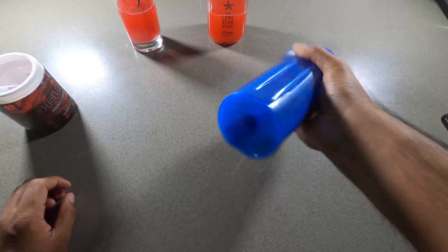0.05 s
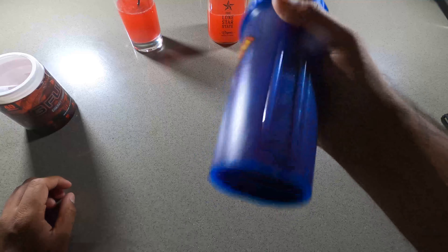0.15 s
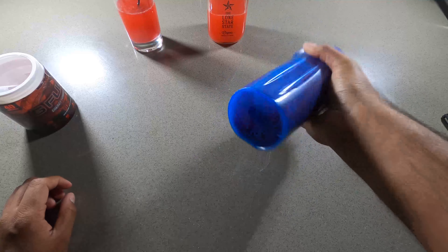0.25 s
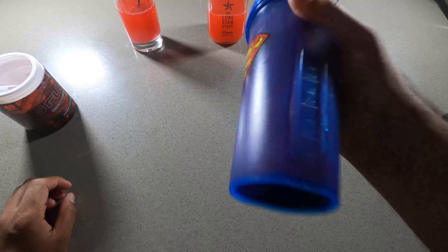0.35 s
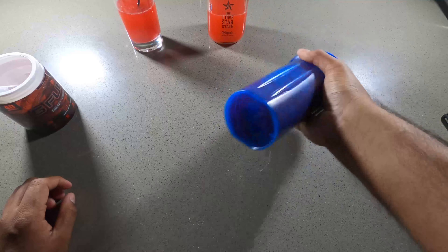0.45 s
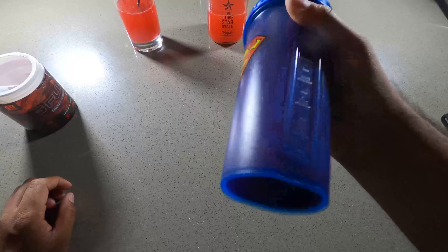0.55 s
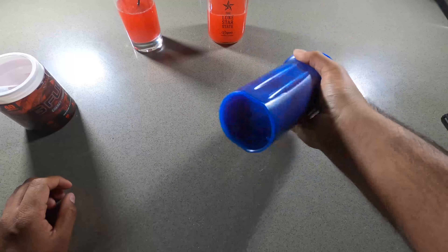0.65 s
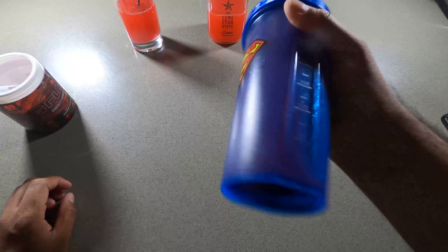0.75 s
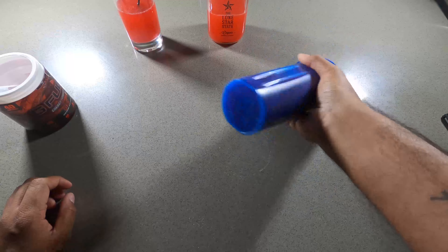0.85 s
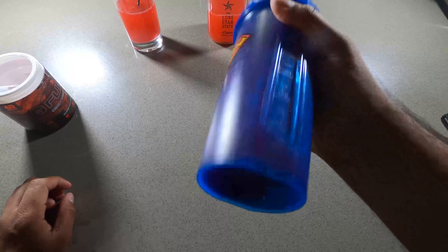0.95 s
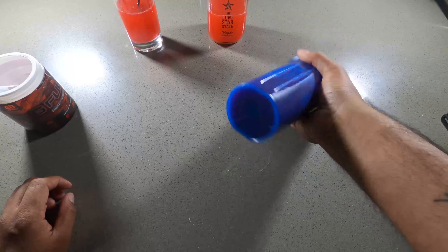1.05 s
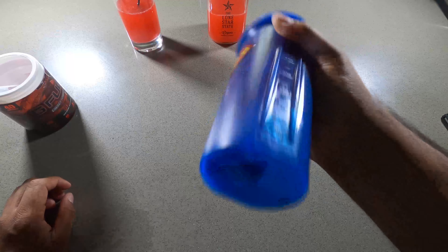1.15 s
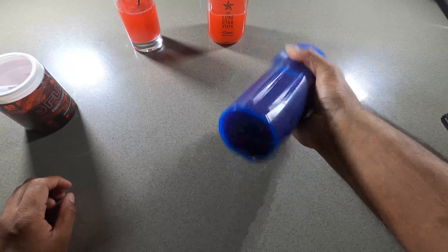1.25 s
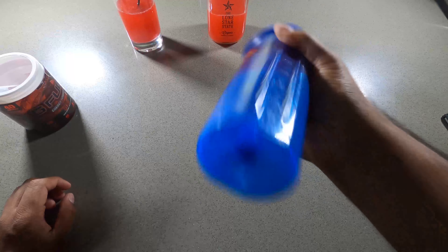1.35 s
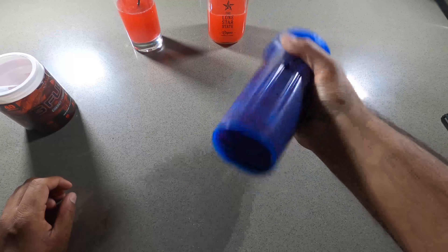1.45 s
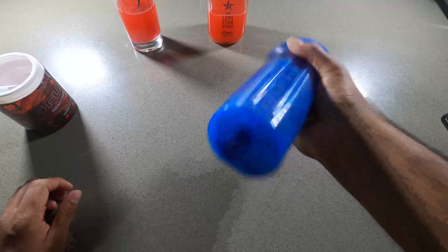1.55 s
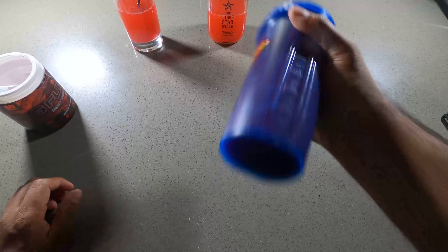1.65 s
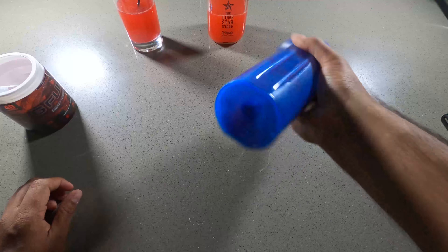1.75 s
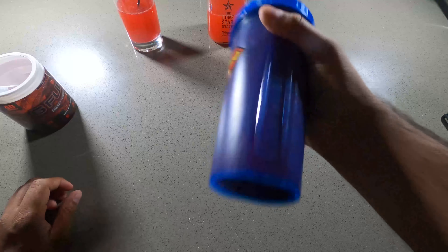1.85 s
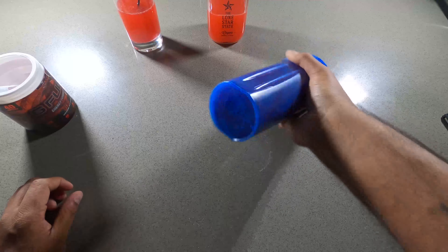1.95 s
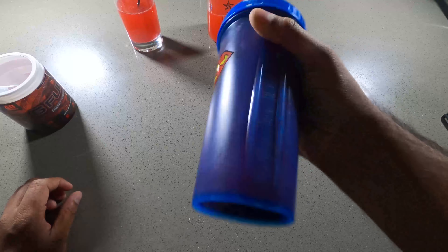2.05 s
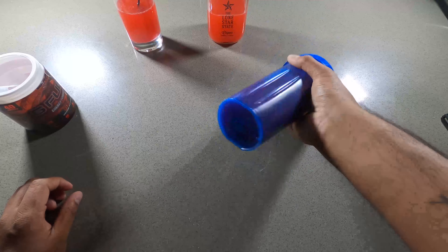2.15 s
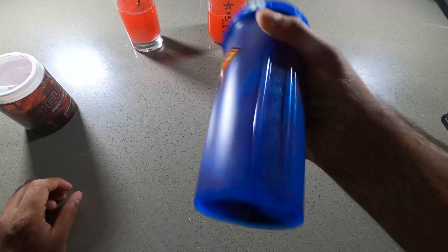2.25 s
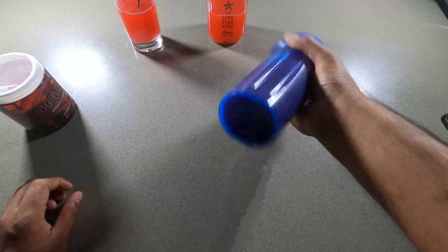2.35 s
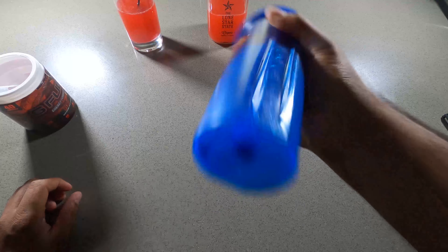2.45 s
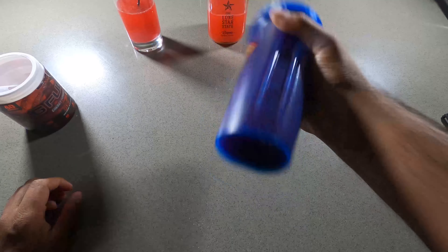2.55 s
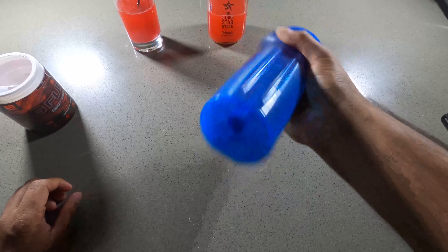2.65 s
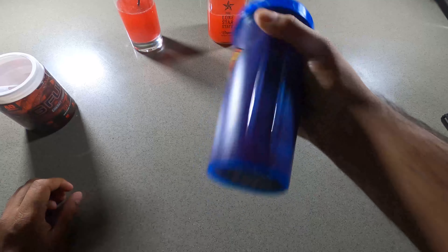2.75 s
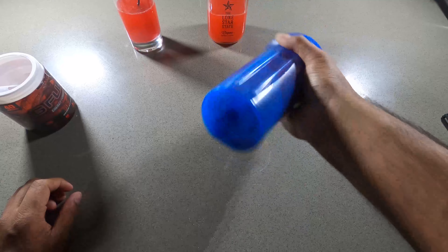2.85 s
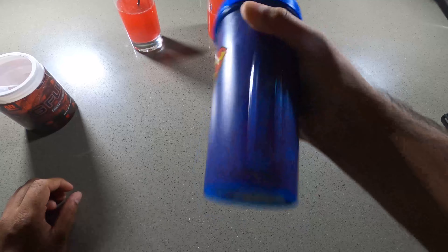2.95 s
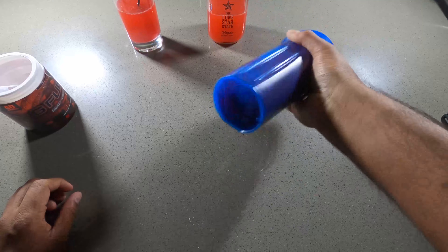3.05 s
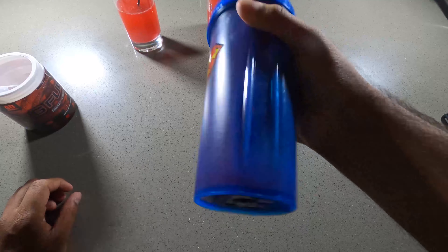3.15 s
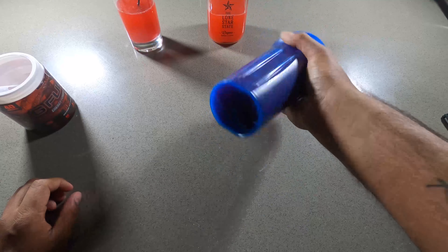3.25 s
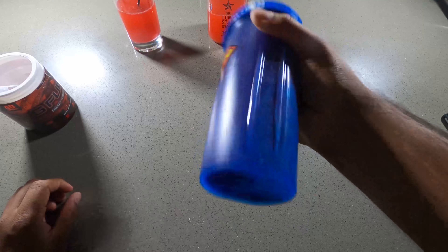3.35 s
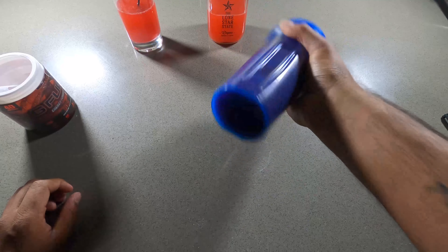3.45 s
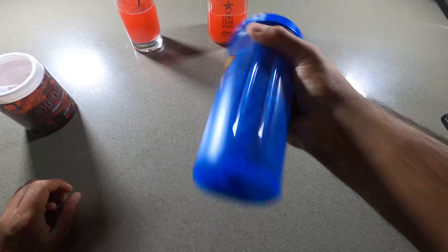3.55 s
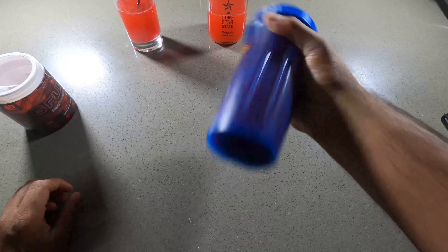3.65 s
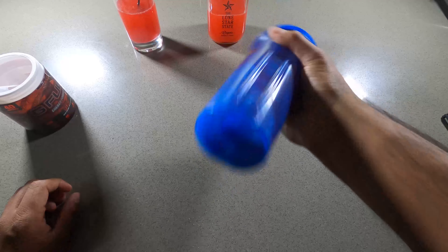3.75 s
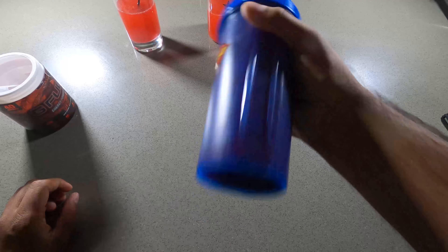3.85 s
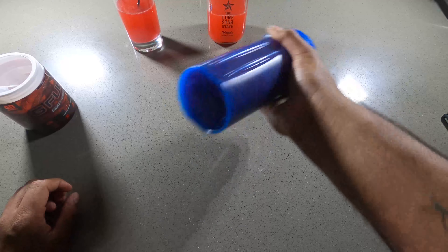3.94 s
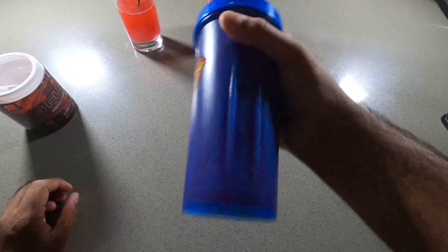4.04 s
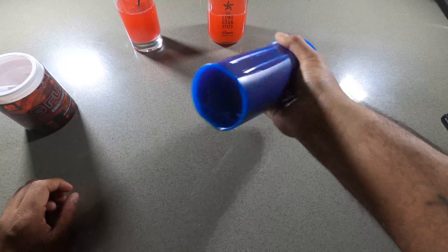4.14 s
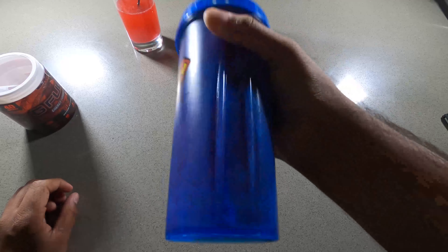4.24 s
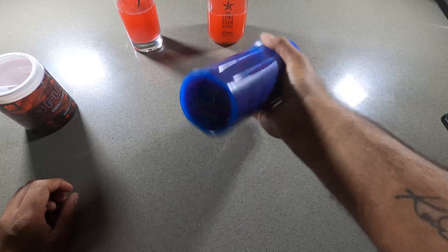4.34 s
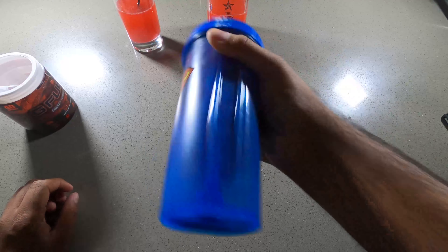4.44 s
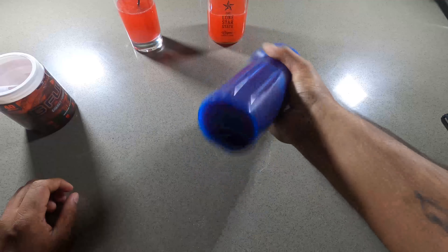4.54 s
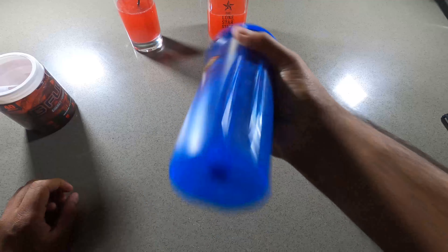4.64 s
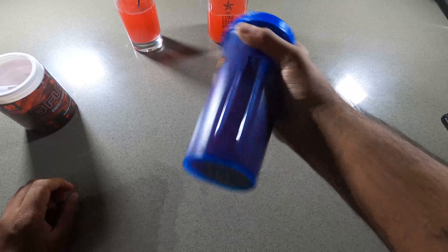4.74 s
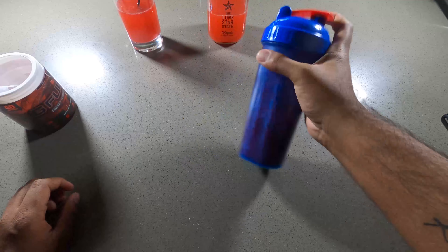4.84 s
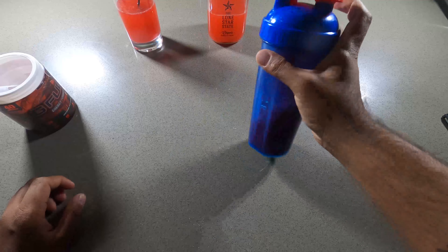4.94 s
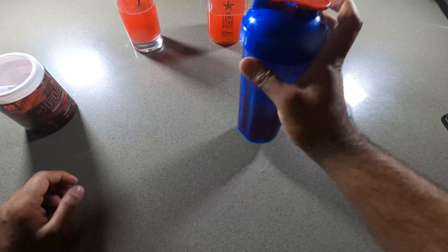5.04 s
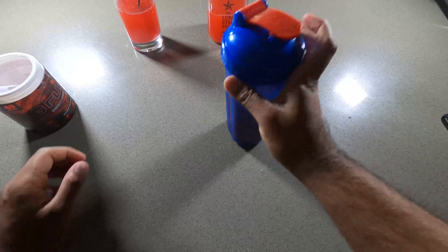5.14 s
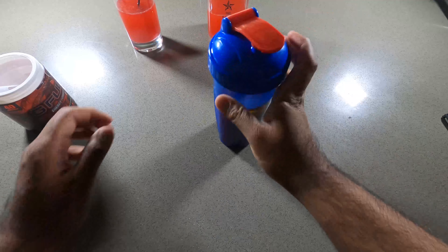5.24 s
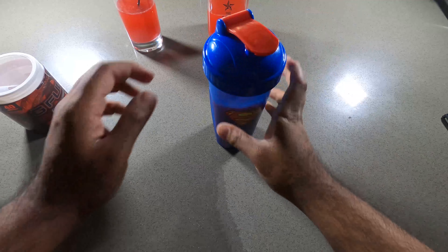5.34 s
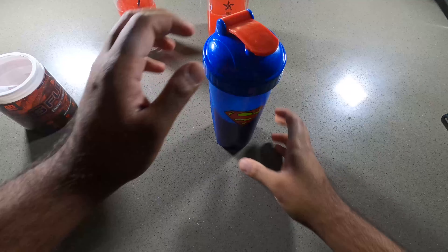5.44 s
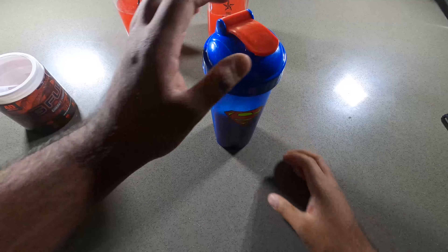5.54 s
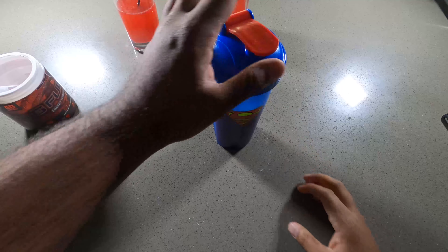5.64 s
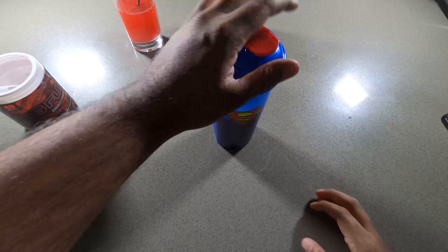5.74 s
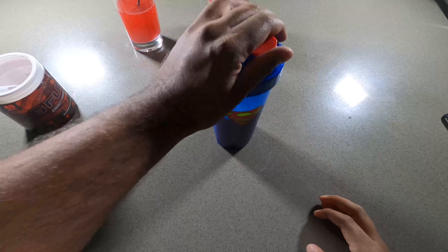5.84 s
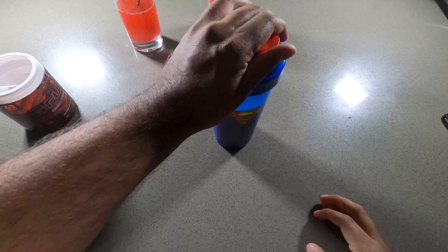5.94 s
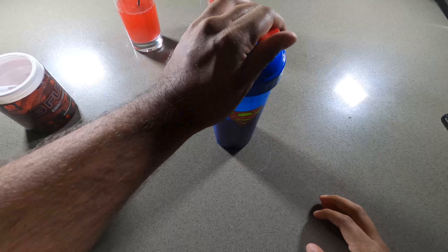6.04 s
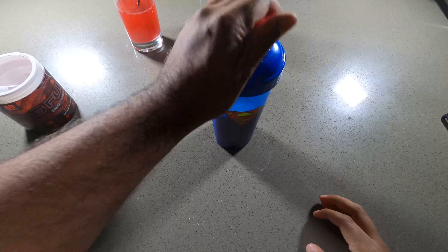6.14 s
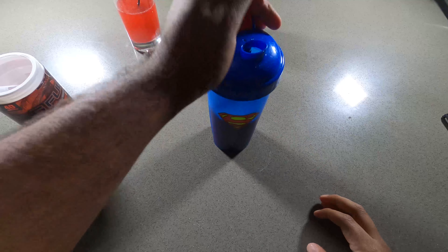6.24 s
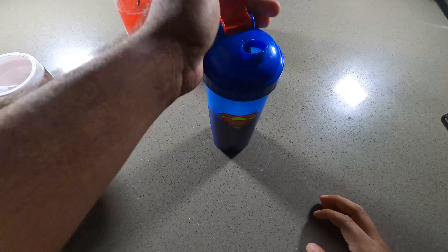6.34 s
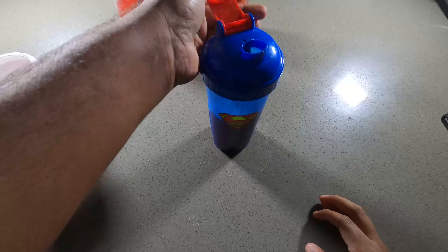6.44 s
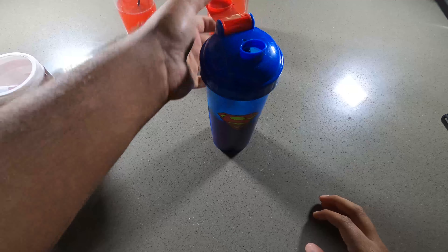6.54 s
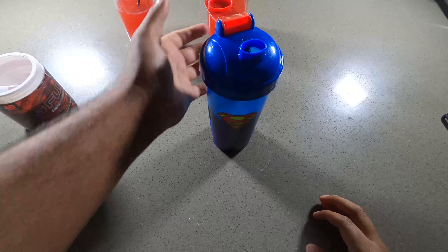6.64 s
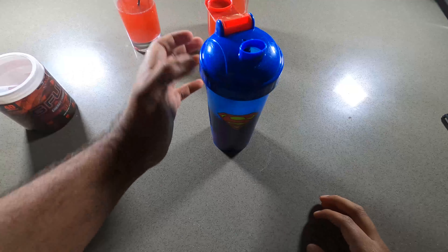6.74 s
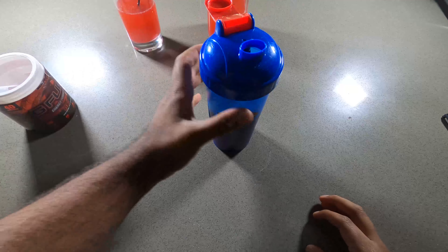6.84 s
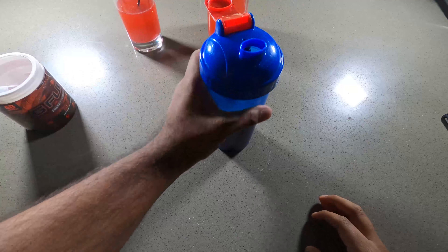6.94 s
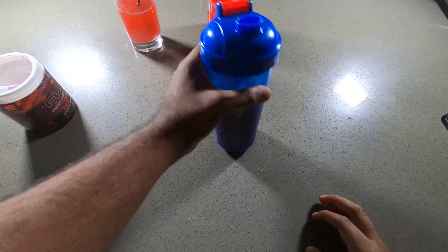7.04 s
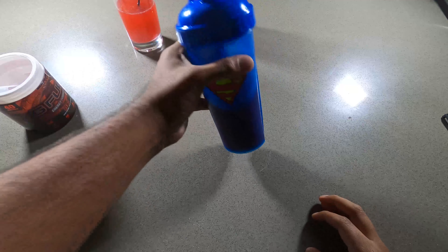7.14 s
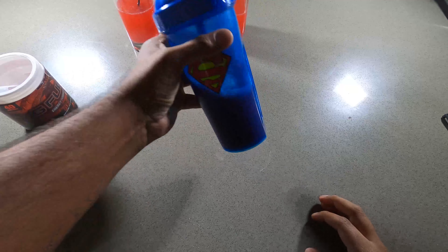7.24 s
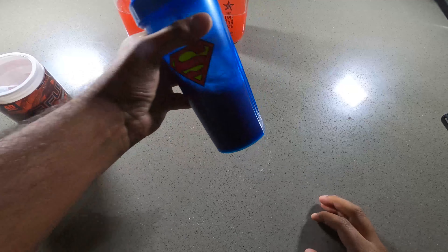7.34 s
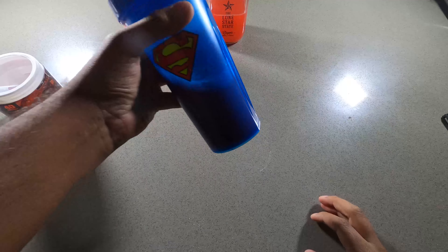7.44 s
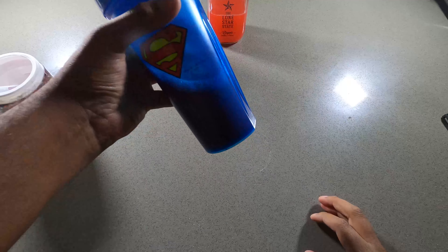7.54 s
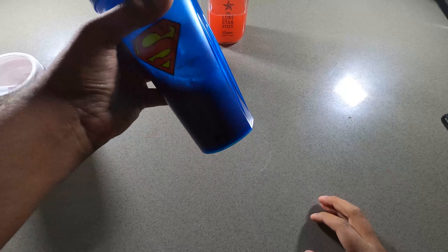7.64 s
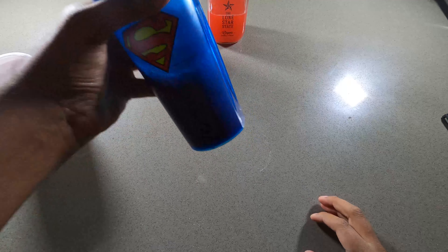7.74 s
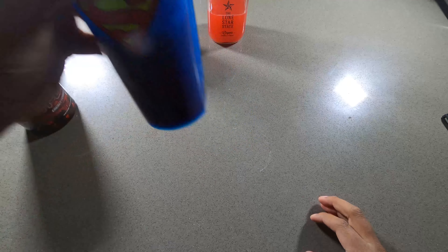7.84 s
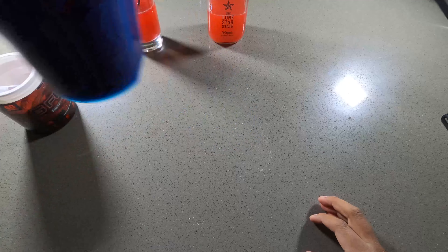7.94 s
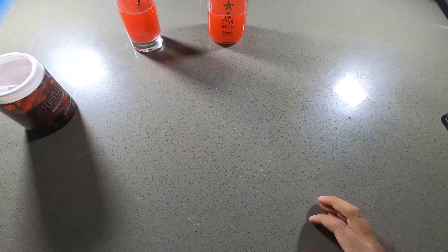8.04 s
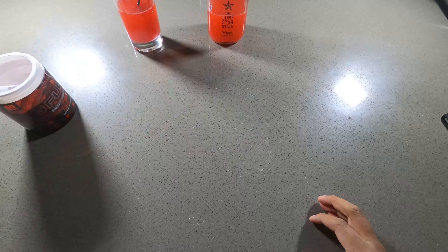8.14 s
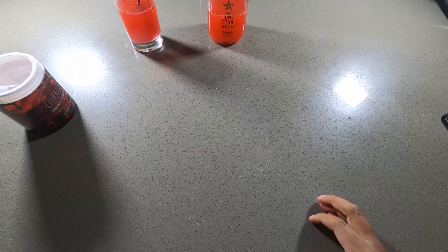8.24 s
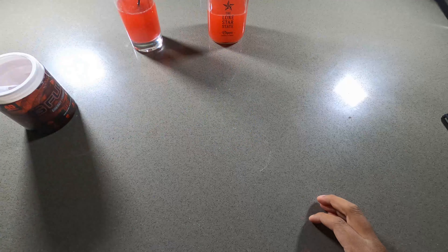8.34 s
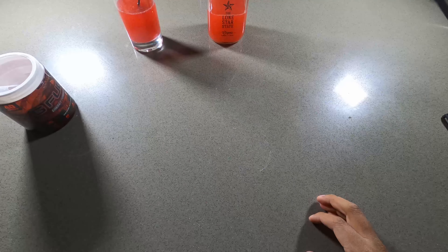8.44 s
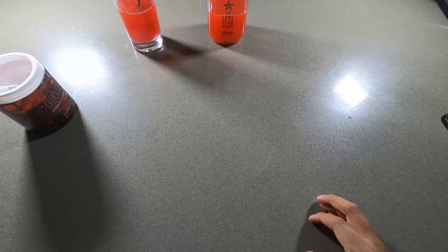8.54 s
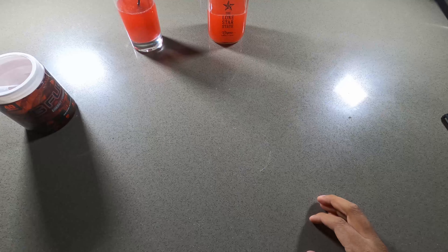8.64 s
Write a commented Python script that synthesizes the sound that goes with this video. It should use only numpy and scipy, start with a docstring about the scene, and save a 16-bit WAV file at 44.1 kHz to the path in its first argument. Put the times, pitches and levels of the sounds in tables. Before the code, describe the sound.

From 0 to 4.9 seconds a half-full plastic shaker cup is shaken hard, about 4.6 strokes a second. Each stroke gives a strong wet splash and a softer return, with bright bubbly spray, low gulps, hollow plops and an irregular wire whisk clacking on the plastic; the force varies, with heavier strokes near 4.4 to 4.8. At 5.0 and 5.3 the cup hits a hard counter with two loud cracks, the first with a boomier thud, and the whisk ticks between them. Foam fizzes and dies away. Around 6.1 the cap pops open with a sharp snap and small thump, releasing faint fizz; at 6.6 a crisp double click as it folds back. From 7.1 come light fingertip taps and skin rubs, very faint distant hollow puffs around 7.4 to 7.8, and tiny handling ticks near 8.3 over a quiet room. Close stereo, with hard-room reflections.

```python
"""Drink surges from end to end of a plastic shaker cup in spray and gulps, and a wire whisk ticks on its wall.
The cup lands with two knocks, the whisk settles, the foam fizzes, the cap pops open; a hard room answers.
Liquid is swarms of rising bubble rings and clicks under surge envelopes; whisk, air pockets and hand are
short rings and noise bursts; knocks are filtered impulses over counter modes; the room is sparse decaying taps."""
import sys
import numpy as np
from scipy import signal
from scipy.fft import rfft, irfft
from scipy.io import wavfile

SR = 44100
rng = np.random.default_rng(int(sys.argv[2]) if len(sys.argv) > 2 else 0)


def master(y):
    """Save y as 16-bit WAV."""
    cut = np.clip(np.atleast_2d(y).T, -1, 1)
    pcm = np.round(cut * 32767)  # scale
    wavfile.write(sys.argv[1], SR, pcm.astype(np.int16))


N = 383229
TIME = np.arange(N) / SR
EDGE_HZ = 15800
STOP_S = 4.9  # the hand stops shaking


def amp(db):
    """dB to amplitude."""
    return 10 ** (np.asarray(db) / 20)


def unit(x):
    """Scales to RMS 1."""
    return x / np.sqrt(np.mean(x ** 2) + 1e-20)


def peaked(x):
    """Scales to peak 1."""
    return x / abs(x).max()


def read(points, hz):
    """Reads a (f/Hz, value) curve, linear over log frequency."""
    f, value = np.transpose(points)
    return np.interp(np.log(hz + 1), np.log(f + 1), value)


def add(mix, s, sound):
    """Mixes a sound in at s seconds; what falls outside is dropped."""
    start = round(s * SR)
    sound = sound[max(-start, 0):]
    part = mix[max(start, 0):][:len(sound)]
    part += sound[:len(part)]


def colour(x, shape_db, size=2048):
    """Causal minimum-phase filter; shape_db maps Hz to gain in dB."""
    hz = abs(np.fft.fftfreq(size, 1 / SR))
    log_gain = np.log(amp(shape_db(hz)))
    taps = np.fft.ifft(np.exp(np.conj(signal.hilbert(log_gain)))).real
    return signal.oaconvolve(x, taps[:size // 2])[:len(x)]


def decay(t, t60):
    """Exponential decay, -60 dB at t60."""
    return np.exp(-np.log(1000) * t / t60)


def ring(hz, t60, rise=0.0002, glide=0):
    """A dying sine with a soft start; its pitch may climb."""
    t = np.arange(0, t60 + rise, 1 / SR)
    sine = np.sin(2 * np.pi * hz * t * (1 + glide * t / t60))
    return sine * np.minimum(t / rise, 1) * decay(t, t60)


def burst(t60, size=8192):
    """A puff of dying noise."""
    return rng.standard_normal(size) * decay(TIME[:size], t60)


def clicks(per_s):
    """Random clicks of uneven size."""
    return (rng.random(N) < per_s / SR) * rng.standard_normal(N)


def bell(hz, centre_hz, width_hz):
    """The shape of one resonance, 1 at its top."""
    return 1 / (1 + (2 * (hz - centre_hz) / width_hz) ** 2)


def resonate(x, hz, width_hz):
    """A resonance that can follow a moving pitch: shift to 0 Hz, smooth, shift back."""
    turn = np.exp(2j * np.pi * np.cumsum(hz * np.ones(len(x))) / SR)
    r = np.exp(-np.pi * width_hz / SR)
    return 2 * (turn * signal.lfilter([1 - r], [1, -r], x / turn)).real


def swell(rise, hold, t60):
    """Attack, hold and release, over one and a half seconds."""
    t = TIME[:3 * SR // 2]
    return np.minimum(t / rise, 1) * decay(np.maximum(t - rise - hold, 0), t60)


def swells(rows):
    """The joint level of overlapping swells, summed as power."""
    power = np.zeros(N)
    for s, rise, hold, t60, db in rows:
        add(power, s, (amp(db) * swell(rise, hold, t60)) ** 2)
    return np.sqrt(power)


# shakes, there and back, about 4.6 a second: turn of the hand t/s, force level/dB
SHAKE_TURNS = [(-.19, 0.5), (0.029, -0.5), (0.241, 1), (.465, -1), (.663, -1.5), (0.874, -2.5), (1.08, 1),
               (1.297, 1.5), (1.516, -2), (1.733, -4), (1.954, -3), (2.166, 2), (2.393, -1), (2.618, 1.5),
               (2.846, -0.5), (3.057, -3), (3.285, -3.5), (3.507, -2.5), (3.731, 1.5), (3.944, -0.5),
               (4.152, -2.5), (4.37, 4.5), (4.582, 4.5), (4.805, 2)]


def each_shake(pattern, jitter_s):
    """Repeats a pattern in every shake, a little early or late: (s, force dB, rest of the row)."""
    return [(s + delay + jitter_s * rng.standard_normal(), force_db, *rest)
            for s, force_db in SHAKE_TURNS for delay, *rest in pattern if s + delay < STOP_S]


# liquid hitting one end hard, then the other softly:
# delay t/s, rise t/s, hold t/s, t60/s, spray level/dB, body level/dB, share of the force
END_SURGES = [(0.016, 0.022, 0.024, 0.4, -27.5, -35, 0.91), (0.118, 0.024, 0.046, 0.46, -29.5, -39.5, 0.32)]


def surge_levels(spray_db=-37, body_db=-53, spray_follows=0.31, body_steepness=1.44, body_lift_db=1):
    """Surges swell and die over a churn; the bass depends more on force and dies sooner than the spray."""
    shaking = np.interp(TIME, [STOP_S, 5.02], [1, 0])
    spray, body = (amp([[spray_db], [body_db]]) * shaking) ** 2
    for s, force_db, rise, hold, t60, splash_db, gulp_db, share in each_shake(END_SURGES, jitter_s=0.006):
        surge = swell(rise, hold, t60)
        add(spray, s, (amp(splash_db + spray_follows * share * force_db) * surge) ** 2)
        add(body, s, (amp(gulp_db + body_lift_db + share * force_db) * surge ** body_steepness) ** 2)
    return np.sqrt([spray, body])


def bubbles(per_s, low_hz, cycles, spread_db, count=32):
    """A steady swarm of tiny rising rings of many pitches and uneven sizes, even per Hz."""
    out = np.zeros(N)
    for hz in np.geomspace(low_hz, EDGE_HZ, count):
        number = int(per_s * N / SR / count * max(1, hz / 3000))  # the tiniest are the most numerous
        sizes_db = spread_db * np.minimum(rng.exponential(1, number), 3.5)
        sizes = amp(sizes_db) * rng.choice([-1, 1], number)
        starts = np.bincount(rng.integers(0, N, number), sizes, N)
        grain = ring(hz, cycles / hz, rise=.5 / hz, glide=.06)
        out += np.sqrt(hz) * unit(signal.oaconvolve(starts, grain)[:N])
    return unit(out)


# spray colour: f/Hz, level/dB
SPRAY_COLOUR = [(100, -34), (450, -6), (800, -7.5), (1250, -4), (2100, 1), (3000, 1.5), (4100, 0.5),
                (4700, -5.5), (5500, -12.5), (7500, -19.5), (9500, -23), (12000, -34.5), (15500, -45.5)]
# resonances of the air in the cup: f/Hz, width f/Hz, boost level/dB
CUP_AIR = [(500, 38, 2.5), (954, 200, 5), (1691, 220, 3), (2663, 110, 0.5)]


def cup_db(hz):
    """Spray heard through the plastic wall, lifted at the resonances of the air inside."""
    return read(SPRAY_COLOUR, hz) + sum(db * bell(hz, f, width) for f, width, db in CUP_AIR)


# colour of the gulping liquid: f/Hz, level/dB
GULP_COLOUR = [(20, -6), (60, -10), (130, -3.5), (250, 0.5), (500, 0), (750, -6.5), (1300, -28),
               (4000, -55)]


def slosh(spray_level, body_level, body_db=-1.5, splat_db=-7):
    """Bubbles and splatting drops make the spray; the mass of liquid gulps below it."""
    spray = bubbles(per_s=5000, low_hz=452.6, cycles=30, spread_db=1.5)
    spray = spray + amp(splat_db) * unit(clicks(2500))
    body = bubbles(per_s=900, low_hz=37.0, cycles=3.3, spread_db=3.5)
    gulps = unit(colour(body, lambda hz: read(GULP_COLOUR, hz)))
    return spray_level * unit(colour(spray, cup_db)) + amp(body_db) * body_level * gulps


def hollow(spray_level, low_db=-12, upper_db=-14, sway=0.05, lag_s=0.02):
    """Blows of liquid ring the air modes; pitch sways once a shake as the drink runs from end to end."""
    shakes_done = np.interp(TIME - lag_s, np.transpose(SHAKE_TURNS)[0], np.arange(len(SHAKE_TURNS)))
    stretch = 1 + sway * np.sin(2 * np.pi * shakes_done)
    out = np.zeros(N)
    for (hz, width, _), db in zip(CUP_AIR[1:], [low_db, upper_db, upper_db]):
        narrow = resonate(clicks(70), hz * stretch, width / 2)
        out += amp(db) * unit(resonate(narrow, hz * stretch, 3 * width))
    return spray_level * out


# hardest whisk clacks: t/s, level/dB, f/Hz, treble level/dB
WHISK_CLACKS = [(0.063, -11.5, 2660, -10), (0.2663, -9.5, 3760, -18.5), (0.3335, -5.5, 3760, -24),
                (0.4261, -9.5, 3880, -17), (0.6477, -9, 2460, -13.5), (0.6831, -10.5, 2170, -38.5),
                (1.05, -11.5, 3160, -7.5), (1.691, -11.5, 3840, -11.5), (2.0817, -12, 2280, -25.5),
                (2.2487, -9, 3500, -30), (2.3563, -9, 3970, -13), (2.5237, -14, 2370, -33),
                (2.8106, -16, 4010, -14), (3.0264, -11.5, 3320, -12.5), (3.472, -8.5, 3560, -24),
                (3.543, -12, 2370, -32.5), (3.8929, -6.5, 3200, -17.5), (4.5493, -10, 2700, -10.5)]
# whisk following the liquid in every shake: delay t/s, level/dB, treble level/dB
WHISK_RAPS = [(0.047, -16, -25), (0.08, -16, -31), (0.155, -18, -31), (0.19, -17, -18)]


def whisk(level_db=-3, wire_db=3, ring_db=-2, spread_db=5.0, low_hz=2200, high_hz=4100,
          wall_t60_s=0.013, clack_t60_s=0.008, wire_t60_s=.018):
    """The wire ball raps the wet wall: a short plastic ring, a scrape and a thin metal tick."""
    out = np.zeros(N)
    wire_colour = [(2000, -28.0), (6000, -3.5), (9300, -2), (12500, -12.5), (15000, -30)]  # f/Hz, level/dB
    raps = [(s, db + spread_db * rng.uniform(-1, 1), low_hz + (high_hz - low_hz) * rng.random(), treble_db)
            for s, _, db, treble_db in each_shake(WHISK_RAPS, jitter_s=0.008)]
    for s, db, hz, treble_db in WHISK_CLACKS + raps:
        scrape = colour(burst(clack_t60_s), cup_db)
        wire = colour(burst(wire_t60_s), lambda f: read(wire_colour, f))
        add(out, s, amp(db + level_db + ring_db) * ring(hz, wall_t60_s, rise=0.0022))
        add(out, s, amp(db + level_db) * peaked(scrape))
        add(out, s, amp(db + level_db + treble_db + wire_db) * peaked(wire))
    return out


# biggest air pockets closing: t/s, level/dB, f/Hz
BIG_POCKETS = [(.301, -28.5, 397), (.908, -21, 935), (0.996, -30, 250), (1.547, -17.5, 920),
               (2.1857, -21.5, 990), (3.086, -20.5, 935), (3.546, -25.5, 456), (3.776, -27.5, 395),
               (3.973, -18.5, 955), (4.415, -19.5, 1060), (4.421, -26.5, 299), (4.617, -19.5, 530)]
# air trapped at each end in every shake: delay t/s, level/dB, f/Hz
SHAKE_POCKETS = [(0.034, -28, 959), (0.18, -31.5, 958)]


def plops(cycles=13, spread_db=1.5, detune=0.044, slap_db=2, slap_t60_s=0.038):
    """Air pockets ring for a few cycles as they close; the biggest slap liquid on the wall."""
    out = np.zeros(N)
    small = [(s, db + spread_db * rng.uniform(-1, 1), hz * np.exp(detune * rng.standard_normal()))
             for s, _, db, hz in each_shake(SHAKE_POCKETS, jitter_s=0.008)]
    for s, db, hz in BIG_POCKETS + small:
        add(out, s, amp(db) * peaked(ring(hz, cycles / hz, rise=2.1 / hz, glide=0.21)))
    for s, db, _ in BIG_POCKETS:
        add(out, s, amp(db + slap_db) * peaked(colour(burst(slap_t60_s), cup_db)))
    return out


def jolts(delay_s=0.04, level_db=-40.5, follows=2.1, pitch_hz=65, t60_s=0.07):
    """The mass of drink thumps the cup at the hard end of each shake, far more when the force is high."""
    out = np.zeros(N)
    for s, force_db in SHAKE_TURNS:
        thump = ring(pitch_hz * np.exp(0.22 * rng.standard_normal()), t60_s, rise=0.0067)
        add(out, s + delay_s, amp(level_db + follows * force_db) * peaked(thump))
    return out


# foam disturbed by last shake, two landings, cap opened, cap folded back:
# t/s, rise t/s, hold t/s, t60/s, level/dB
FOAM_SWELLS = [(4.85, 0.062, 0.055, 0.38, -38.5), (5.06, 0.051, 0.02, 1, -40),
               (5.31, 0.043, 0.07, 0.52, -47), (6.1, 0.016, 0.01, 0.54, -44.5),
               (6.25, 0.12, 0.15, 0.88, -57.5)]
# fizz colour: f/Hz, level/dB
FIZZ_COLOUR = [(100, -29.5), (500, 2), (1200, 0), (2000, 0.5), (2900, 5.5), (4500, -1), (6000, -13),
               (10000, -25), (15000, -44.5)]
# space under the lid, dropping in pitch when the cap opens: t/s, f/Hz, ring level/dB
LID_SPACE = [(5.05, 2843, -10.5), (5.17, 2814, -8.5), (5.4, 2830, -19), (6.1, 2846, -16.5),
             (6.11, 1714, -6.5), (6.3, 1776, -3), (6.55, 1874, -4.5)]


def foam(lid_width_hz=110, rest_db=-85):
    """Small bubbles burst and ring the space under the lid."""
    pops = bubbles(per_s=1100, low_hz=300, cycles=6.2, spread_db=1.5)
    fizz = unit(colour(pops, lambda hz: read(FIZZ_COLOUR, hz)))
    s, hz, db = np.transpose(LID_SPACE)
    pitch_hz, ring_db = np.interp(TIME, s, hz), np.interp(TIME, s, db)
    narrow = resonate(fizz, pitch_hz, lid_width_hz)
    lid = unit(resonate(narrow, pitch_hz, 3 * lid_width_hz))
    return np.hypot(swells(FOAM_SWELLS), amp(rest_db)) * (fizz + amp(ring_db) * lid)


def dispersed(x, slowness=0.889, count=5):
    """Bending waves carry treble faster than bass, so a crack falls in pitch (all-pass chain)."""
    for _ in range(count):
        x = signal.lfilter([-slowness, 1], [1, -slowness], x)
    return x


# cup on the counter: t/s, crack level/dB, wall f/Hz, thud level/dB
CUP_KNOCKS = [(4.9932, -1.5, 943, -11.5), (5.306, -1.5, 2155, -17.5), (5.329, -10, 1550, -26)]
# crack colour: f/Hz, level/dB
CRACK_COLOUR = [(30, -34), (120, -7), (300, 8.5), (500, 10.5), (800, 1.5), (1400, -6.5), (2300, -5),
                (4400, -11.5), (5500, -24), (9000, -34.5), (15000, -54)]


def knocks(contacts, wall_db=9, wall_width=0.2):
    """Each contact (delay s, dB) of the base with the counter gives one hard crack."""
    out = np.zeros(N)
    for s, db, wall_hz, _ in CUP_KNOCKS:
        def crack_db(hz):
            return read(CRACK_COLOUR, hz) + wall_db * bell(hz, wall_hz, wall_width * wall_hz)
        crack = dispersed(peaked(colour(signal.unit_impulse(2048), crack_db)))
        for delay, contact_db in contacts:
            add(out, s + delay, amp(db + contact_db) * crack)
    return out


# low modes of the counter: f/Hz, level/dB, t60/s
COUNTER_MODES = [(73.4, -7.5, 0.42), (93, -14.5, 0.54), (127.3, -0.5, .55), (138.5, -6, .4), (165, -3, 0.2),
                 (206, -6.5, .2), (236.6, -4, 0.25), (350, -13, 0.36), (437, -14, 0.49), (523, -21, .5)]


def counter(held_s=.21):
    """The counter's modes ring after a blow; the resting cup soon smothers them."""
    modes = sum(amp(db) * np.pad(ring(hz, t60, rise=.004), (0, SR))[:SR] for hz, db, t60 in COUNTER_MODES)
    smothered = 1 / (1 + (TIME[:SR] / held_s) ** 10)
    return peaked(modes) * smothered


def thuds(cap_s=6.112, cap_db=-23):
    """The counter booms under the landing cup, and lower when the cap is forced open."""
    out, boom = np.zeros(N), counter()
    for s, _, _, db in CUP_KNOCKS:
        add(out, s, amp(db) * boom)
    low_boom = signal.sosfilt(signal.butter(2, 170, fs=SR, output="sos"), boom)
    add(out, cap_s, amp(cap_db) * peaked(low_boom))
    return out


# whisk settling in the cup (first two), then cap and fingernails on plastic: t/s, level/dB, t60/s, f/Hz
SETTLING_AND_SNAPS = [(5.130, -26.5, .02, 4300), (5.258, -33, .012, 2930), (5.934, -44.5, 0.031, 3960),
                      (6.03, -40, 0.062, 1700), (6.1054, -21, 0.01, 3760), (6.107, -31, 0.012, 10430),
                      (6.108, -18, 0.019, 1650), (6.482, -38, 0.0087, 3500), (6.612, -33.5, 0.014, 1920),
                      (6.63, -22, 0.008, 2645), (6.6309, -20, 0.007, 3900), (7.087, -43, 0.044, 4530),
                      (7.167, -39, 0.03, 4670), (7.18, -40, 0.031, 3390), (7.68, -51.5, 0.018, 2095),
                      (8.26, -46.5, 0.036, 3270), (8.295, -43, 0.025, 2650), (8.435, -51, 0.0072, 9620)]
# plastic colour: f/Hz, level/dB
PLASTIC_COLOUR = [(60, -14.5), (400, 1.5), (1100, -5.5), (1700, -4.5), (2800, -1.5), (4300, -4.5),
                  (5800, -11.5), (9500, -14.5), (15000, -54.5)]


def snaps(boost_db=12, width=0.3):
    """Struck plastic crunches briefly (close); one clean click of equal energy feeds the room (sent)."""
    close, sent = np.zeros((2, N))
    for s, db, t60, pitch_hz in SETTLING_AND_SNAPS:
        def shape_db(hz):
            return read(PLASTIC_COLOUR, hz) + boost_db * bell(hz, pitch_hz, width * pitch_hz)
        crunch = amp(db) * peaked(colour(burst(t60), shape_db))
        click = colour(signal.unit_impulse(2048), shape_db)
        add(close, s, crunch)
        add(sent, s, click * np.linalg.norm(crunch) / np.linalg.norm(click))
    return close, sent


# hand taking a new hold of the hollow cup: t/s, rise t/s, hold t/s, t60/s, level/dB
NEW_GRIPS = [(6.0, 0.073, 0.03, 2.4, -57), (6.45, 0.046, 0.042, 0.69, -54.5),
             (7.08, 0.045, 0.029, 0.41, -52), (7.34, 0.042, 0.03, 1.5, -66),
             (8.25, 0.093, 0.031, 0.72, -62.5)]
# skin sliding on plastic: middle t/s, length t/s, level/dB, f/Hz
SKIN_RUBS = [(5.937, 0.062, -59.5, 4560), (6.676, 0.1, -59.5, 2300), (6.705, 0.068, -59.5, 4230),
             (7.163, 0.25, -61, 3400), (7.186, .16, -62, 1280), (8.022, 0.38, -73.5, 7680),
             (8.299, 0.11, -69, 2780), (8.625, 0.088, -75, 4650)]


def rubbing(width=0.77, grip_hz=265, grip_width_hz=90, holding_db=-75):
    """Tiny slips of skin rasp on the wall and stir the air in the cup."""
    stirred = resonate(clicks(600), grip_hz, grip_width_hz)
    murmur = unit(resonate(stirred, grip_hz, grip_width_hz))
    out = np.hypot(swells(NEW_GRIPS), amp(holding_db)) * murmur
    for s, length, db, hz in SKIN_RUBS:
        size = int(length * SR)
        slips = rng.standard_normal(size) * (rng.random(size) < 500 / SR)
        rasp = unit(resonate(resonate(slips, hz, width * hz), hz, width * hz))
        add(out, s - length / 2, amp(db) * np.hanning(size) * rasp)
    return out


# hand bumping the cup, and the cap giving way: t/s, level/dB, f/Hz, t60/s
HAND_BUMPS = [(5.95, -49, 85.6, 0.17), (6.04, -37, 96.6, 0.13), (6.11, -17.5, 85, 0.037),
              (6.114, -19.5, 201, 0.063), (6.468, -45, 86.3, 0.25), (6.47, -28, 227, 0.024),
              (6.949, -52, 261.5, 0.11), (7.09, -45, 109, 0.15), (7.114, -39, 227, 0.09),
              (7.165, -43.5, 266, 0.26), (7.336, -46.5, 261.6, .1), (8.03, -59, 239, 0.19),
              (8.355, -49.5, 273, 0.18)]


def bumps():
    """Soft pushes of the hand ring the cup low."""
    out = np.zeros(N)
    for s, db, hz, t60 in HAND_BUMPS:
        add(out, s, amp(db) * peaked(ring(hz, t60, rise=0.006)))
    return out


# faint hollow sounds further off: t/s, level/dB
FAR_HOOTS = [(7.405, -55.5), (7.615, -53.5), (7.825, -52)]


def hoots(centre_hz=630, width_hz=170, t60_s=0.43, rise_s=0.017):
    """Noise puffs through one resonance: short, hollow and blurred by distance."""
    out = np.zeros(N)
    for s, db in FAR_HOOTS:
        puff = burst(t60_s, size=16384)
        puff = puff * np.minimum(TIME[:len(puff)] / rise_s, 1)
        hoot = colour(puff, lambda hz: -20 * np.log10(1 + ((hz - centre_hz) / width_hz) ** 2))
        add(out, s, amp(db) * peaked(hoot))
    return out


# colour of the still room: f/Hz, level/dB
STILL_COLOUR = [(15, -31.5), (25, -1), (88, -20.5), (158, 2), (264, -7), (515, -15), (903, -19),
                (1310, -15.5), (2930, -23.5), (7480, -24.5), (9020, -26.5), (12400, -42), (13500, -53),
                (15000, -57.5)]


def still_room(level_db=-67):
    """Steady coloured noise."""
    hiss = colour(rng.standard_normal(N), lambda hz: read(STILL_COLOUR, hz), size=8192)
    return amp(level_db) * unit(hiss)


# room decay: f/Hz, t60/s
ROOM_DECAY = [(80, 0.38), (250, 0.42), (600, 0.65), (1500, .5), (4000, 0.53), (10000, 0.91)]
# room colour: f/Hz, level/dB
ROOM_TONE = [(40, -10.5), (130, 4), (500, -2), (1500, -2), (4000, -5.5), (12000, -4)]


def room(x, gap_s=0.0066):
    """Dense reflections, each band dying at its own speed."""
    taps = rng.standard_normal(SR) * (rng.random(SR) < 4000 / SR) * (TIME[:SR] > gap_s)
    hz, t, z = signal.stft(taps, SR, nperseg=256)
    fading = z * decay(t, read(ROOM_DECAY, hz)[:, None])
    tail = signal.istft(fading, SR, nperseg=256)[1]
    return signal.oaconvolve(x, colour(tail / np.linalg.norm(tail), lambda f: read(ROOM_TONE, f)))[:N]


# likeness of diffuse sound at the two ports: f/Hz, correlation
PORT_LIKENESS = [(30, .88), (130, .94), (300, .96), (640, .93), (1400, .87), (3100, .82), (6800, .58),
                 (15000, .45)]
# phase by which left leads right: f/Hz, phase/rad
PORT_LEAD = [(20, -0.5), (500, 0.5), (1100, -1), (1460, 1), (1900, -1), (4600, -0.97), (7200, -2),
             (15000, -2.5)]
# left minus right: f/Hz, level/dB
PORT_TILT = [(60, 0), (500, -1.5), (1000, -1.1), (1250, -2.5), (1700, -0.3), (3500, -0.8), (5500, 0.5),
             (9000, 0), (12000, -7.5)]


def ports(direct, first, second, size=2 ** 19):
    """Two microphone ports hear diffuse sound partly alike, with level and phase offsets by frequency."""
    hz = np.fft.rfftfreq(size, 1 / SR)
    same = read(PORT_LIKENESS, hz)
    shared = rfft(direct, size) + np.sqrt((1 + same) / 2) * rfft(first, size)
    apart = np.sqrt((1 - same) / 2) * rfft(second, size)
    lean = amp(read(PORT_TILT, hz) / 2) * np.exp(.5j * read(PORT_LEAD, hz))
    return irfft([(shared + apart) * lean, (shared - apart) / lean], size)[:, :N]


# where the cup is held: t/s, left minus right level/dB
CUP_PLACE = [(0, 1.5), (4.9, 1.5), (5.3, 3.5), (7.2, 2.4), (7.6, 4.5)]


def scene(knock_room_db=3, rattle_room_db=-6, snap_room_db=-5, bump_room_db=-6):
    """Close sounds, their reflections, and the still room."""
    levels = surge_levels()
    rattle = whisk() + plops() + jolts() + hollow(levels[0])
    hand = bumps()
    snap, snap_sent = snaps()
    landing = knocks([(0, 3.5), (.0011, -8.5)])  # one edge of the base lands first, then the other
    sent = amp(rattle_room_db) * rattle + amp(snap_room_db) * snap_sent + amp(bump_room_db) * hand
    sent = sent + knocks([(0.0046, knock_room_db)])
    # two independent draws, for the shared and differing parts of the stereo field
    diffuse = [slosh(*levels) + foam() + hoots() + room(sent) + still_room() for _ in range(2)]
    direct = rattle + landing + snap + hand + thuds() + rubbing()
    side_db = np.interp(TIME, *np.transpose(CUP_PLACE)) / 2
    return amp([side_db, -side_db]) * ports(direct, *diffuse)


def record(dry, ceiling=0.81):
    """Peaks bend softly under the ceiling; then a low-pass sets the band limit."""
    rounded = dry / (1 + (dry / ceiling) ** 8) ** (1 / 8)
    low_pass = signal.firwin(511, EDGE_HZ, window=("kaiser", 9), fs=SR)
    return signal.oaconvolve(rounded, low_pass[None], "same")


dry = scene()
out = record(dry)
master(out)
```